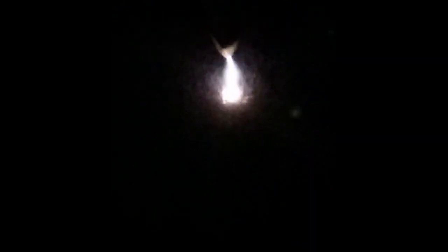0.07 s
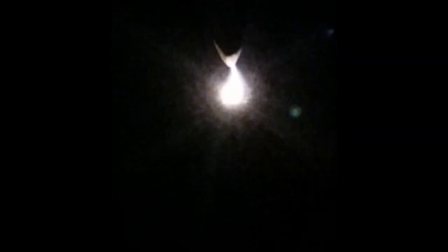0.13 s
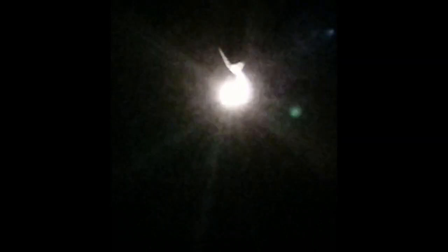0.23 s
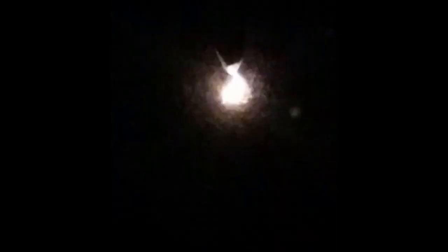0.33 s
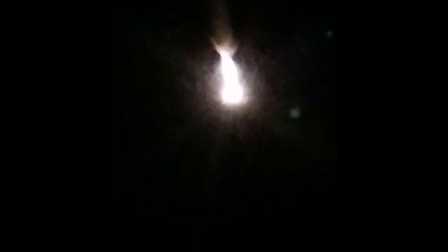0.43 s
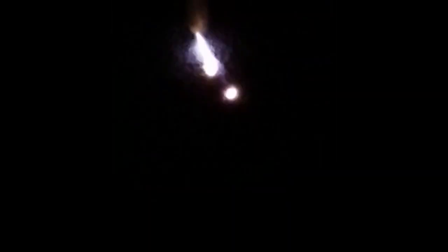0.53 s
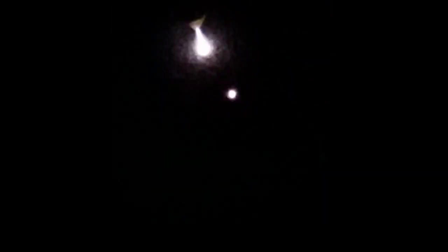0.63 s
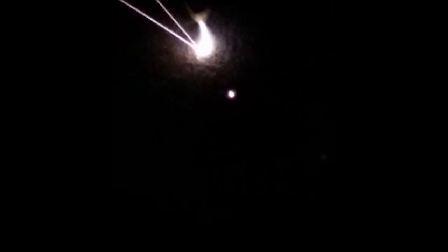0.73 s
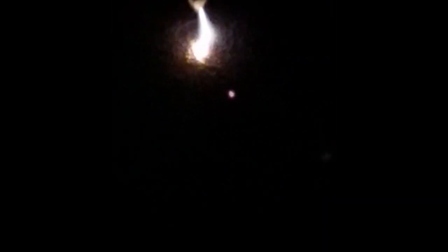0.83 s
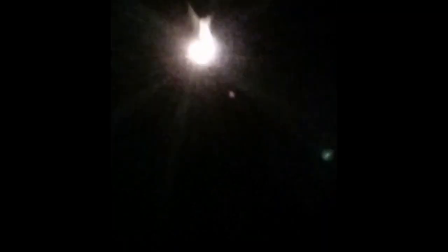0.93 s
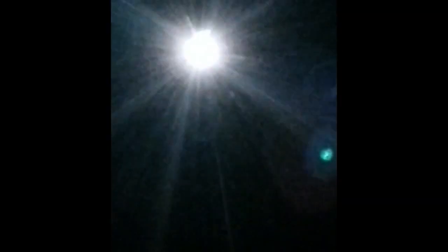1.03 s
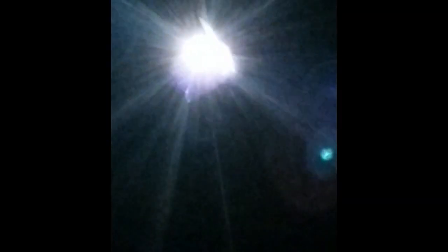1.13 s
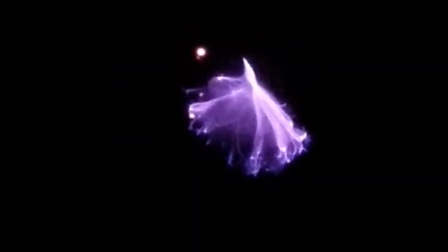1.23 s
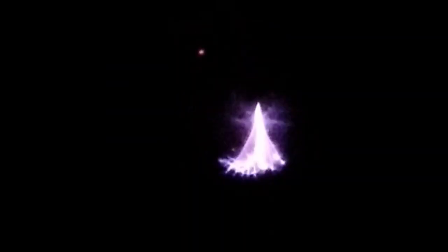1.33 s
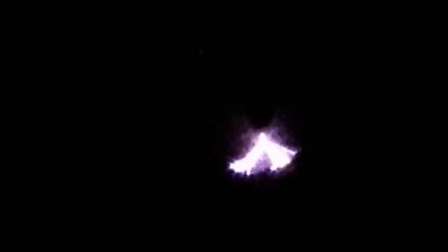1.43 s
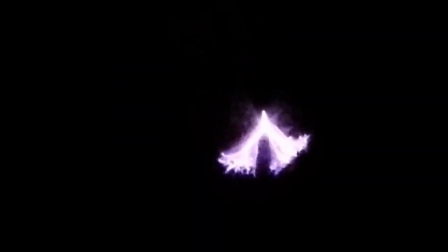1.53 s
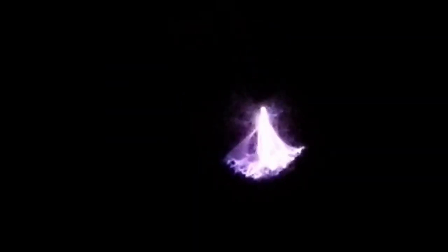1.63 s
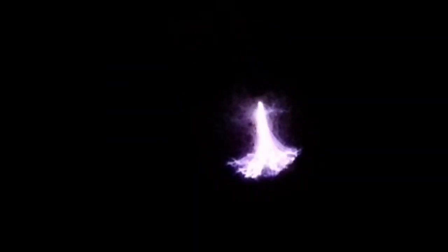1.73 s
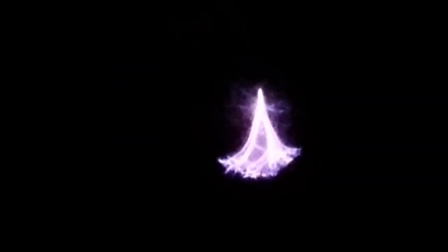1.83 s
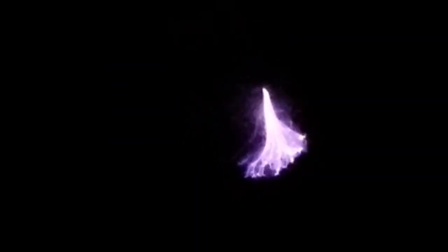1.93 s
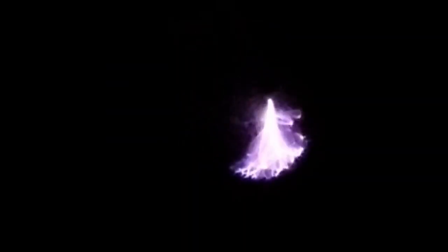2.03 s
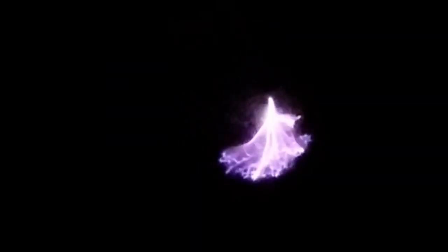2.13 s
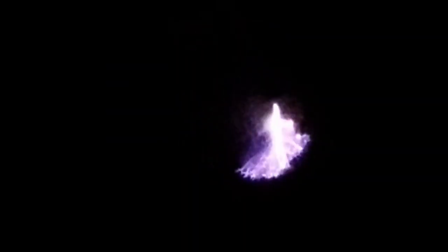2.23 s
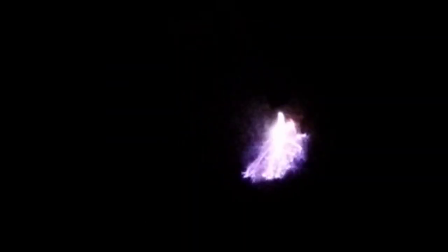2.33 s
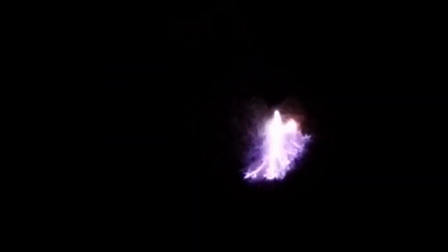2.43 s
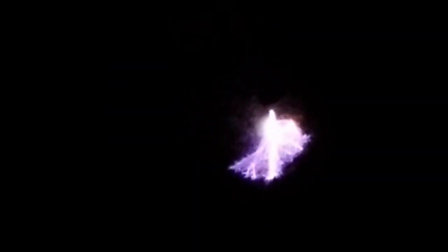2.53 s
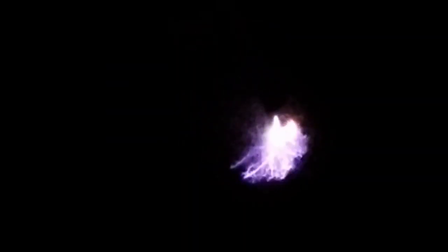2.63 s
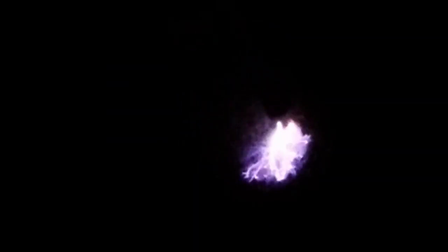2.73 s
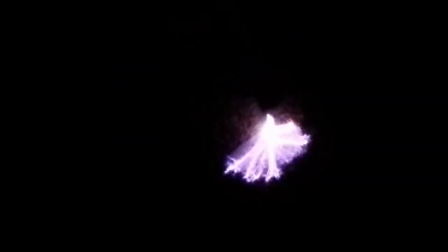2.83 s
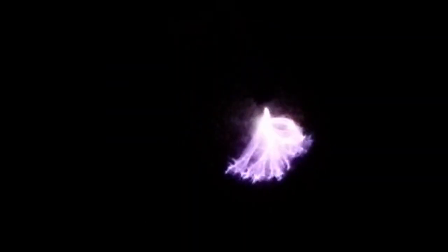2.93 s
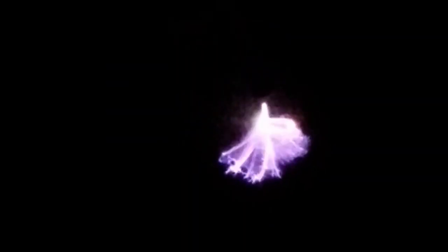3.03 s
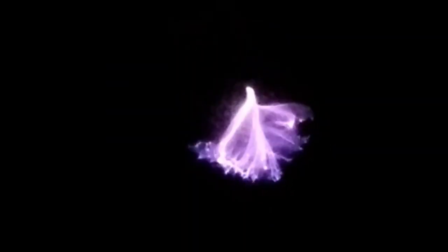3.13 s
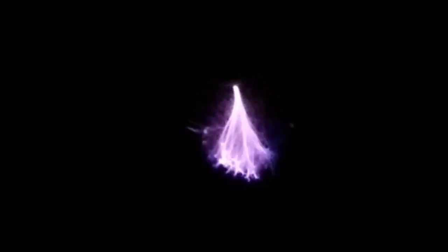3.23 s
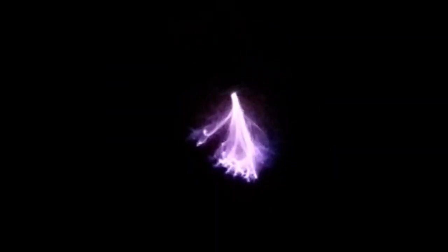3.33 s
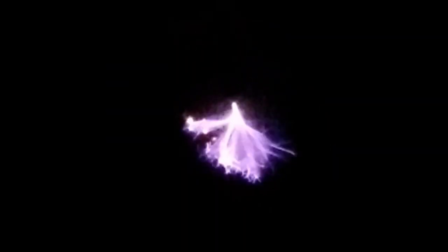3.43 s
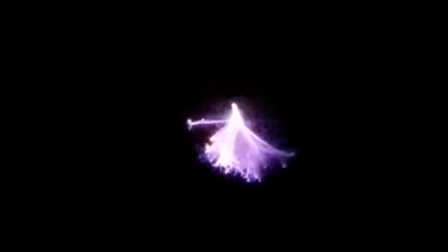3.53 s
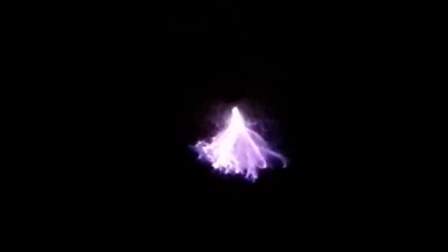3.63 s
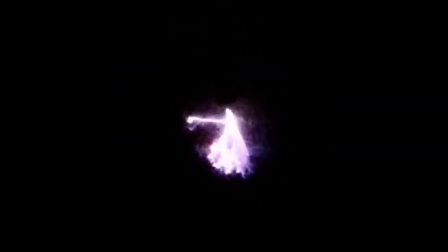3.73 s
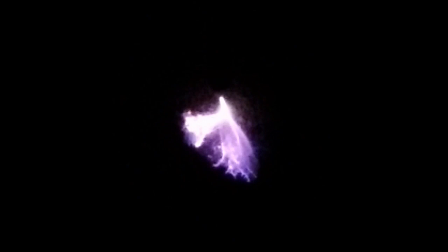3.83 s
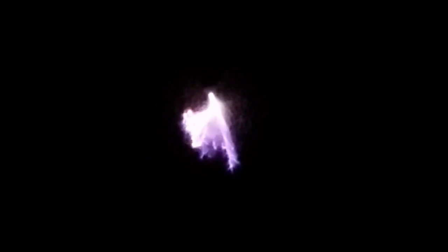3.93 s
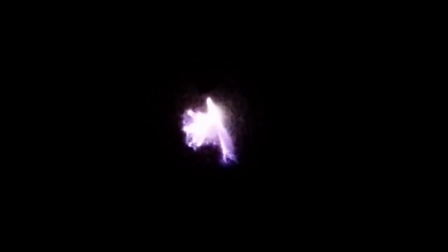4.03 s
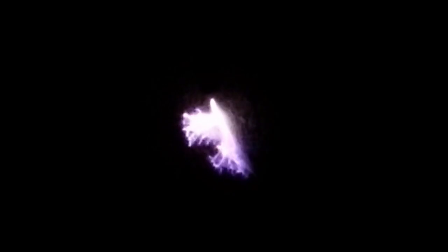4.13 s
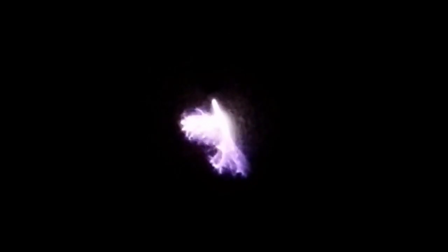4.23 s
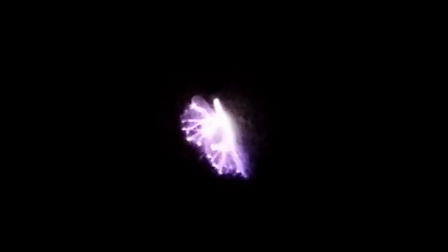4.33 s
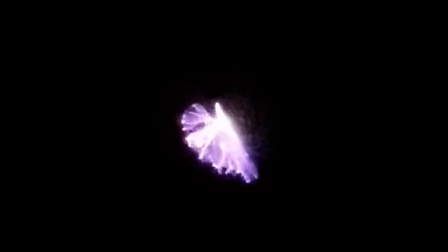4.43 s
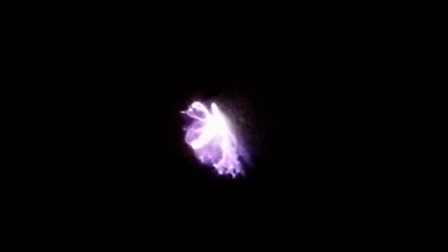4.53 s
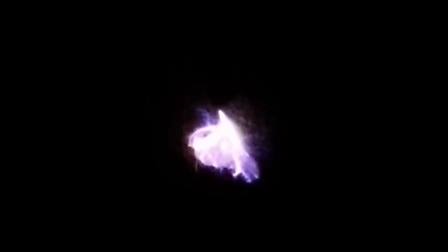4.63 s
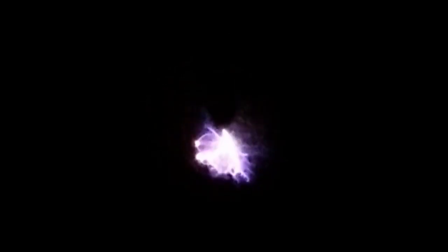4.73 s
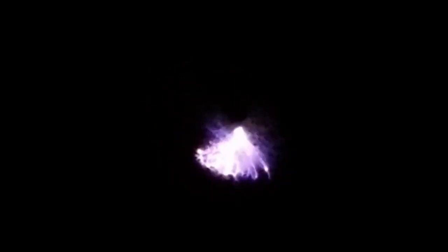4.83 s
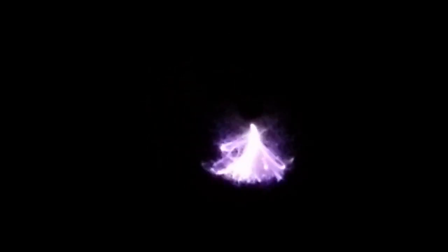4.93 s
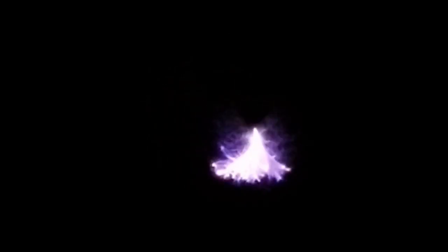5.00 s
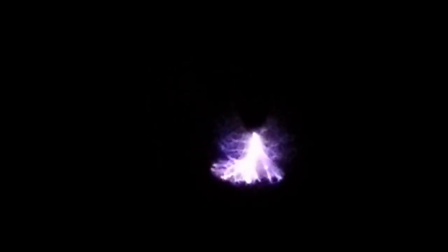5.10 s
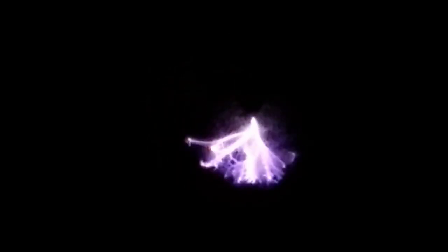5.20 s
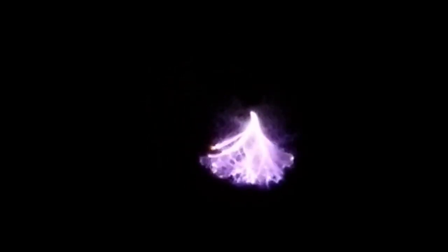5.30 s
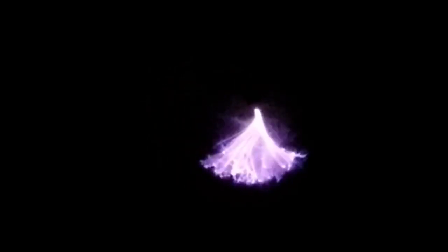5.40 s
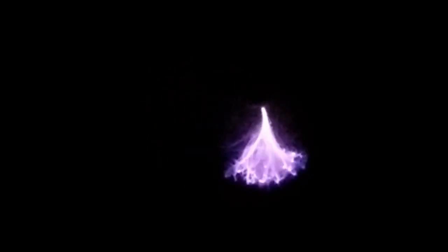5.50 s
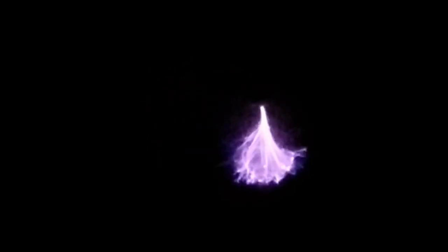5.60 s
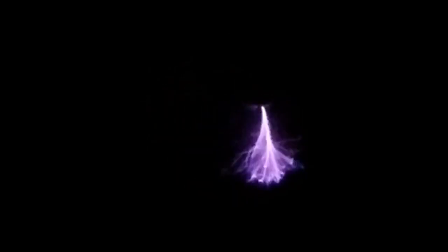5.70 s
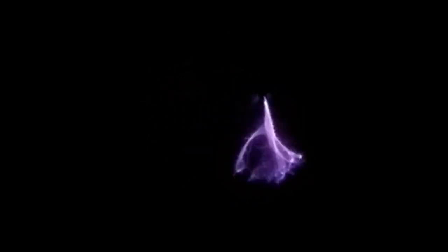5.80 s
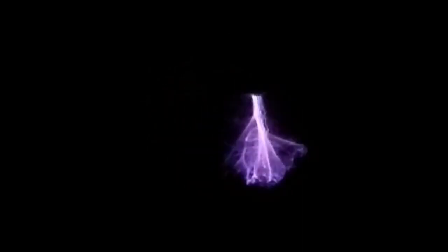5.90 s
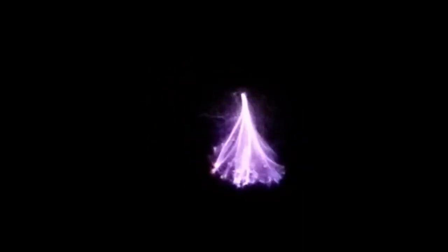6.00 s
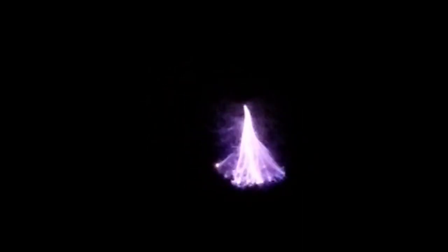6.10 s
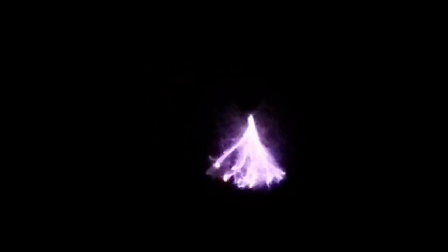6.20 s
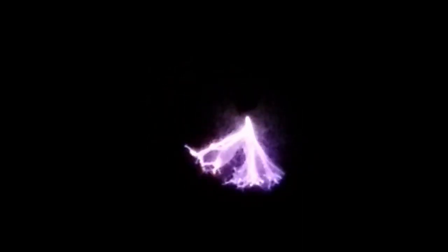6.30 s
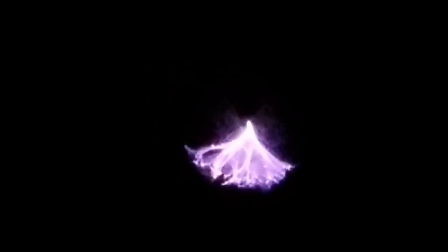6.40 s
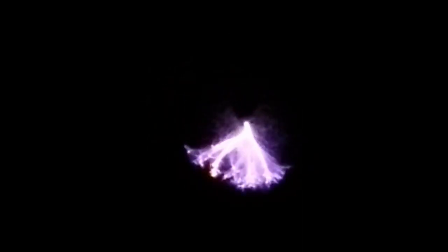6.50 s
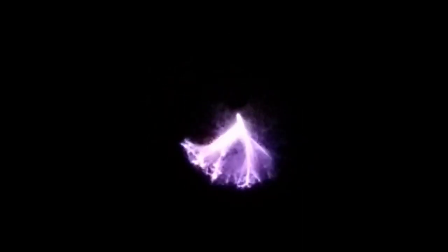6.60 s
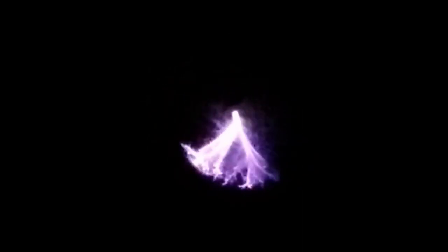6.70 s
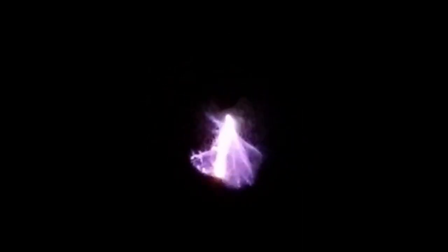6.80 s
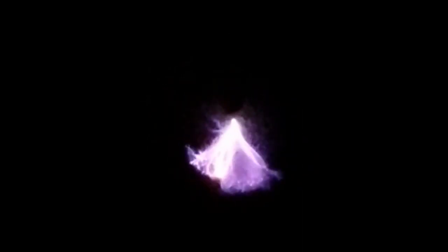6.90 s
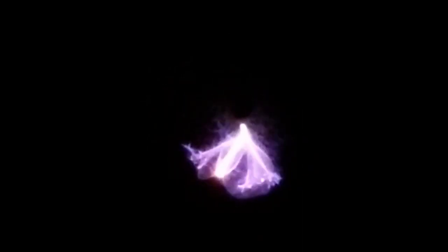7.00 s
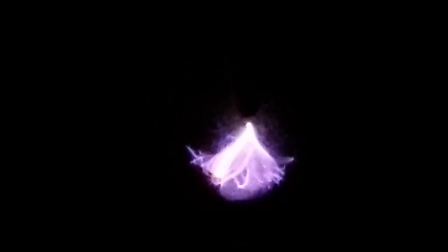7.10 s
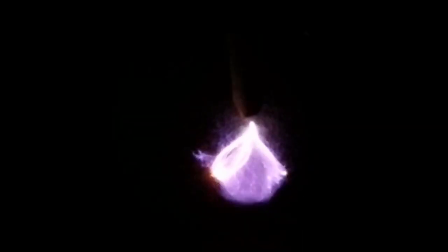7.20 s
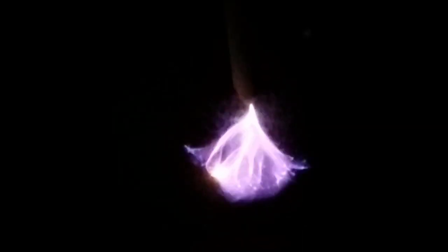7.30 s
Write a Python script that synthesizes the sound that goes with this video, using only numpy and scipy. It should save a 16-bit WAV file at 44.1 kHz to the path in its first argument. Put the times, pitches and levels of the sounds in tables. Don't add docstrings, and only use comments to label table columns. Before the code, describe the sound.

A harsh mains-rate electrical buzz starts thin, then bursts into loud whistling, sizzling spark trains with sharp snaps, soft puffs and a throbbing hum.

```python
import sys
import numpy as np
from scipy import signal
from scipy.fft import rfft, irfft, next_fast_len
from scipy.io import wavfile
from scipy.ndimage import uniform_filter1d, map_coordinates

SR = 44100
rng = np.random.default_rng(int(sys.argv[2]) if len(sys.argv) > 2 else 0)


def master_out(mix):
    frames = np.transpose(np.atleast_2d(mix))
    ceiling = np.clip(frames, -1, 1)
    pcm = np.round(ceiling * 32767).astype(np.int16)
    wavfile.write(sys.argv[1], SR, pcm)


def gain_from_db(level_db):
    decades = np.asarray(level_db, float) / 20
    return 10 ** decades


N = 324135
STRIKE_HZ = 120
SIZE = next_fast_len(N + SR // 2)
HZ = np.fft.rfftfreq(SIZE, 1 / SR)
TIME = np.arange(N) / SR


def unit(x):
    return x / np.sqrt(np.mean(x ** 2) + 1e-20)


def columns(rows, at, scale=lambda v: v):
    first, *rest = np.transpose(rows)
    return np.array([np.interp(scale(at), scale(first), c) for c in rest])


def wobble(rate):
    return map_coordinates(rng.standard_normal(int(N * rate / SR) + 4), [TIME * rate])


def filtered(x, response):
    return irfft(rfft(x, SIZE) * response, SIZE)[..., :N]


def highpass(hz, order):
    return (1j * HZ / (hz + 1j * HZ)) ** order


def lowpass(hz, order=1):
    return 1 / (1 + 1j * HZ / hz) ** order


def resonance(hz, width_hz):
    return 1j * HZ * width_hz / (hz ** 2 - HZ ** 2 + 1j * HZ * width_hz)


def causal(db):
    cepstrum = irfft(np.log(gain_from_db(db)), SIZE)
    cepstrum[:, 1:SIZE // 2] *= 2
    cepstrum[:, SIZE // 2 + 1:] = 0
    return np.exp(rfft(cepstrum))


def clicks(s, size):
    place = np.clip(np.ravel(s), 0, N / SR) * SR
    index = place.astype(int)[:, None] + np.arange(-7, 9)
    offset = index - place[:, None]
    kernel = np.sinc(offset) * np.cos(offset * np.pi / 16) ** 2
    weights = kernel * np.ravel(size)[:, None]
    return np.bincount(index.ravel() + 7, weights.ravel(), N + 32)[7:N + 7]


def excess(db, base_db):
    return np.sqrt(np.maximum(gain_from_db(db) ** 2 - gain_from_db(base_db) ** 2, gain_from_db(db - 15) ** 2))


def per_band(x, way, lo_hz, hi_hz):
    heard = filtered(x, way.mean(axis=0) * (HZ > lo_hz) * (HZ < hi_hz))
    return x / np.std(heard)


def shaky_tones(tones, level_db, level_rate, phase_rad, phase_rate):
    total = 0
    for multiple, db in tones:
        level = gain_from_db(db + level_db * wobble(level_rate))
        shake = phase_rad * wobble(phase_rate)
        total = total + level * np.sin(2 * np.pi * STRIKE_HZ * multiple * TIME + shake)
    return total


def path():
    # hz, left_db, right_db
    ports = [(232, -33, -37), (410, -45, -5), (480, -19.5, -14), (840, -13, -3), (1213, -1.5, -4),
             (2140, -10, -12.5), (2675, -1, 4), (3070, -3, -11), (3990, -1.5, -1), (4756, 5, -2.5),
             (6500, -6, -1), (7590, -6.5, -16.5), (9900, -20, -14.5), (13900, -19.5, -19)]
    # hz, width_hz, left_db, right_db
    case = [(520, 220, 2.5, -20), (2344, 140, 3.5, -27.5), (3514, 30, 8, -24), (4350, 1130, 3, -3),
            (5040, 220, 5.5, 7.5), (7155, 1150, -2.5, 7), (9100, 290, 11, 3.5), (10570, 120, 5, -36),
            (10870, 200, 11, -29), (11570, 140, 8, -37)]
    # delay_ms, left_db, right_db
    bench_echoes = [(0.882, -30, -13), (1.252, -16.5, -61), (1.422, -16.5, -15.5), (2.099, -11.5, -19),
                    (3.5, -29.5, -26), (4.298, -34, -12.5)]
    # hz, t60_s
    wall_decay = [(300, 0.42), (3000, 0.16), (12000, 0.015)]
    shell = 1 + sum(gain_from_db([[left], [right]]) * resonance(hz, width) for hz, width, left, right in case)
    right_lag = np.exp(-2j * np.pi * HZ * [[0], [.09e-3]])
    direct = -causal(columns(ports, HZ + 1, np.log)) * shell * right_lag
    bench = 1 + sum(gain_from_db([[left], [right]]) * np.exp(-2j * np.pi * HZ * ms / 1000)
                    for ms, left, right in bench_echoes)
    hz, t, noise = signal.stft(rng.standard_normal((2, SR // 3)), SR, nperseg=256)
    fade = gain_from_db(-60 * t / columns(wall_decay, hz + 1, np.log).T)
    tail = signal.istft(noise * fade, SR, nperseg=256)[1]
    walls = gain_from_db(-10) * rfft(np.pad(tail, ((0, 0), (130, 0))), SIZE) / np.linalg.norm(tail[0])
    return direct, direct * (bench + walls * highpass(900, order=2))


def shape():
    # start_s, strike_db, train_db, fine_db (above the train)
    short_paths = [(0.0, -47.5, -48, -1.5), (0.267, -52, -50.5, -2), (0.425, -53, -55, -3),
                   (0.558, -46.5, -42, -3.5), (0.608, -44.3, -44, 0), (0.765, -51, -48.5, -5.5),
                   (0.95, -47, -47.5, -5.5), (1.033, -48, -43.5, -2.5), (1.141, -54.5, -55, -1.5),
                   (1.217, -48.5, -46, -4.5)]
    # start_s, strike_db, train_db, fine_db (above the train)
    long_paths = [(1.275, -45.5, -35, -5), (1.317, -34.5, -29.5, -4.5), (1.356, -43.0, -26.5, -1),
                  (1.482, -43.5, -37.5, -0.5), (1.716, -45.5, -28, -3.5), (1.925, -46.5, -26.5, -1),
                  (2.148, -43.8, -25, -5.5), (2.191, -42.5, -31.5, -3.5), (2.4, -43, -34.5, -2.5),
                  (3.0, -39.5, -33, -3), (3.268, -42, -25.7, -4), (3.352, -46.5, -25, -2.3),
                  (3.56, -43, -31, -2.5), (3.807, -45, -38.5, 2.5), (4.058, -46.5, -41.0, -4.3),
                  (4.758, -43, -38, -1.5), (4.833, -45.5, -44.5, -1), (4.983, -42.2, -36, -1.5),
                  (5.06, -43.5, -28.5, -4), (5.183, -42, -31.5, -3.5), (5.308, -43, -25.5, -4.5),
                  (5.383, -47, -23.9, -4), (5.625, -46, -24.5, -2), (5.94, -67, -37.5, -4),
                  (6.027, -47, -26, -2), (6.36, -47, -33, -1.5), (6.71, -47, -27.5, -3.5),
                  (6.881, -41.5, -34.6, -2), (7.008, -42, -35, 2), (7.242, -40, -35, 4.6)]
    jump_s, creep_s = .016, .04
    slack_db, taut_db = -38, -25
    narrow_db, wide_db = -5, -1.5
    start_s, *levels = np.transpose(short_paths + long_paths)
    held = np.array(levels)[:, np.maximum(np.searchsorted(start_s, TIME) - 1, 0)]
    long = TIME > long_paths[0][0] - jump_s
    jump, creep = (uniform_filter1d(held, max(round(s * SR), 1), axis=1) for s in (jump_s, creep_s))
    strike_db, train_db, fine_db = np.where(long, jump, np.minimum(creep, jump + 3))
    stretch = long * np.clip((train_db - slack_db) / (taut_db - slack_db), 0, 1)
    wide = stretch * np.clip((fine_db - narrow_db) / (wide_db - narrow_db), 0, 1)
    return strike_db, train_db, train_db + fine_db, long, stretch, wide


def room_floor():
    hiss = filtered(rng.standard_normal((2, N)), highpass(640, order=2) * lowpass(4000))
    return gain_from_db(-62) * unit(hiss)


def core():
    # multiple (of the strike rate), level_db (above the strike)
    buzz_tones = [(4, -8.5), (5, -16.5)]
    load_db = uniform_filter1d(shape()[0], size=4000)
    buzz = shaky_tones(buzz_tones, level_db=1.5, level_rate=8, phase_rad=.3, phase_rate=12)
    return gain_from_db(load_db) * buzz * gain_from_db([[-2.5], [1.5]])


def throb():
    # multiple (of the strike rate), level_db
    hum_tones = [(.5, -19), (1, 3.5), (1.5, -23), (2, -6.5)]
    # hz, density_db (per Hz)
    rumble_colour = [(12, -39), (20, -17), (59, -2.5), (119, -4), (312, -6.5), (450, -5.5), (580, -8),
                     (990, -120)]
    # peak_s, peak_db (of the hum), width_s
    gas_swells = [(0.2, -60.5, 0.055), (0.74, -54, 0.043), (1.398, -47.5, 0.16), (1.7, -54.4, 0.067),
                  (1.93, -50, 0.13), (2.17, -54, 0.09), (2.35, -45, 0.17), (2.51, -46, 0.039),
                  (2.64, -57, 0.062), (2.8, -48.5, 0.42), (3.25, -42.5, 0.11), (3.69, -54, 0.23),
                  (3.81, -52.8, 0.062), (4.04, -49, 0.075), (4.221, -56, 0.12), (4.49, -49, 0.16),
                  (4.74, -42.5, 0.06), (5.07, -50.1, 0.07), (5.21, -46.5, 0.21), (5.4, -45.5, 0.11),
                  (5.54, -55.7, 0.19), (5.8, -57.4, 0.08), (5.87, -59.3, 0.04), (5.94, -71, 0.034),
                  (6.11, -66, 0.067), (6.38, -57.8, 0.12), (6.54, -52.5, 0.15), (6.84, -51.5, 0.084),
                  (7.06, -47, 0.069), (7.27, -46.5, 0.14)]
    # start_s, peak_db
    powder_puffs = [(1.325, -28), (1.684, -36), (2.154, -46), (2.494, -41), (2.622, -25), (3.195, -42.5),
                    (4.024, -28.5), (4.425, -44), (5.052, -35), (5.851, -43), (6.095, -48), (7, -43),
                    (7.23, -38)]
    *_, long, stretch, _ = shape()
    calm_db = np.where(long, -58 - 3.5 * stretch, -66.5)
    swells = sum(gain_from_db(db - 6 * (2 * (TIME - s) / width) ** 2) ** 2 for s, db, width in gas_swells)
    hum_db = 10 * np.log10(gain_from_db(calm_db) ** 2 + swells)
    rumble_db = -55.5 + 0.82 * (hum_db + 49)
    hum = unit(shaky_tones(hum_tones, level_db=2.2, level_rate=30, phase_rad=.8, phase_rate=9))
    colour = gain_from_db(columns(rumble_colour, HZ + 1, np.log))
    mid, side = filtered(rng.standard_normal((2, N)), colour)
    rumble = unit(mid * gain_from_db(1.9 * wobble(25))) + gain_from_db(-16.5) * unit(side) * [[1], [-1]]
    s, db = np.transpose(powder_puffs)
    puffs = filtered(clicks(s, gain_from_db(db + 34)), resonance(130, 150) * lowpass(500))
    return gain_from_db(hum_db - 2.0) * hum + gain_from_db(rumble_db + 2.0) * rumble + puffs


def snaps(way):
    # start_s, peak_db, low_db (low part against the peak)
    big_sparks = [(0.008, -26.5, -15), (0.733, -18.5, -32), (0.952, -31, -19), (1.278, -37, -20),
                  (1.325, -19.5, -30), (1.339, -37, -22), (1.355, -27, -19), (1.72, -21.5, -9),
                  (1.77, -25, -37), (2.187, -19.5, -27), (2.27, -22, -24), (2.503, -21, -14),
                  (3.654, -31, -24), (4.919, -23, -16), (5.061, -30, -21), (5.104, -18.5, -27),
                  (5.595, -16.5, -37.5), (5.823, -13, -13), (6.039, -14, -4), (6.536, -20.5, -13.5),
                  (6.711, -36, -23)]
    s, db, low_db = np.transpose(big_sparks)
    sharp = filtered(clicks(s, gain_from_db(db + 7.5)), highpass(800, order=2))
    dull = filtered(clicks(s, gain_from_db(db + low_db - 5)), lowpass(1800))
    loudest = np.abs(irfft(way.mean(axis=0), SIZE)).max()
    return filtered(sharp + dull, way / loudest)


def streamers():
    chance = rng.random((9000, 2))
    jump_s = chance[:, 0] * N / SR
    crest = 0.48 + 0.49 * np.cos(2 * np.pi * STRIKE_HZ * (jump_s - .006))
    strays = clicks(jump_s, crest * gain_from_db(-3.3 * np.log(chance[:, 1] + .015)))
    return filtered(strays, lowpass(4500, order=2))


def strikes(start, burst, long, wide):
    wander_ms = .012 * long + .3 * wide
    wander = wander_ms / 1000 * rng.standard_normal(start.shape)
    return filtered(clicks(start + wander, burst), lowpass(2200, order=2))


def spark_trains(zero, start, burst, long, stretch, wide, starved):
    # time_s, sparks_per_s
    recharge = [(0, 4150), (1.27, 4020), (1.48, 4070), (1.52, 7100), (1.7, 3200), (1.76, 4800), (1.9, 4240),
                (2.05, 4900), (2.25, 3900), (2.4, 5130), (3.2, 5600), (3.27, 3640), (3.42, 5260),
                (5.1, 5670), (5.31, 6430), (5.62, 4290), (6.35, 5960), (7.35, 5300)]
    rate = columns(recharge, zero).T
    disorder = np.where(long, .03 + .25 * wide, .04)
    length_ms = np.where(long, .09 + 0.56 * stretch ** 3 + 0.88 * wide, .14)
    length_ms = length_ms + .5 * long * starved
    scatter = rng.standard_normal((2, len(zero), 16))
    pace = rate * (1 + 0.41 * disorder * rng.standard_normal((len(zero), 1)))
    steps = np.abs(1 + disorder * scatter[0]) / pace
    after_ms = 1000 * (np.cumsum(steps, axis=1) - steps[:, :1])
    swell = np.exp(-(after_ms / length_ms - .6) ** 2) * gain_from_db(13 * disorder * scatter[1])
    swell = swell / np.linalg.norm(swell, axis=1, keepdims=True)
    train = clicks(start + after_ms / 1000, burst * swell)
    return filtered(train, highpass(1500, order=2) * lowpass(10000, order=2))


def fine_sparks(start, burst):
    from_hz = 7600
    t = TIME[:300] / 0.0014
    flare = signal.fftconvolve(clicks(start, burst), np.sqrt(t) * np.exp(-t ** 0.93))[:N]
    shared, *own = rng.standard_normal((3, N)) * gain_from_db(2 * rng.standard_normal(N))
    return filtered((shared + np.array(own)) * (0.78 + unit(flare)), HZ ** 6 / (HZ ** 6 + from_hz ** 6))


def arc(direct, way):
    # start_s, end_s, level_db
    gaps = [
        (5.809, 5.8215, -30),
        (5.828, 5.8385, -30),
    ]
    # hz, gain_db
    short_colour = [(1300, -0.5), (1800, -2.5), (2300, -0.5), (2900, 1.5), (3600, 7), (5000, -0.5),
                    (5900, 7), (7200, 4)]
    strike_db, whistle_db, sizzle_db, long, stretch, wide = shape()
    flicker_db = 1.3 * (1 - stretch) * wobble(20)
    whistle_db, sizzle_db = whistle_db + flicker_db, sizzle_db + 0.88 * flicker_db
    stray = np.clip(long * 0.21 + 0.36 * stretch + 0.09, 0, 1)

    zero = np.arange(N * STRIKE_HZ // SR) / STRIKE_HZ
    now = (zero * SR).astype(int)
    long_now, stretch_now, wide_now = np.array([long, stretch, wide])[:, now, None]
    starved = strike_db[now, None] < -53
    lag_ms = np.where(long_now, 2.9 + 1.097 * wide_now, 3.65)
    luck = rng.standard_normal((2, len(zero), 1))
    start = zero[:, None] + (lag_ms + .006 * luck[0]) / 1000
    burst = gain_from_db((1.2 + 1.2 * wide_now) * luck[1])

    strike = per_band(strikes(start, burst, long_now, wide_now), way, 450, 1600)
    crackle = per_band(streamers(), way, 450, 1600)
    low = np.sqrt(1 - stray) * strike + np.sqrt(stray) * crackle
    train = spark_trains(zero, start, burst, long_now, stretch_now, wide_now, starved)
    spill_db = strike_db + 8 + 10 * np.log10(stray + 0.0072)
    high = excess(whistle_db, spill_db) * per_band(train, way, 3000, 7800)
    sizzle = per_band(fine_sparks(start, burst), direct, 5580, 21000)
    fine = excess(sizzle_db, whistle_db - 9.0) * sizzle

    lit = gain_from_db(sum(db * (TIME > t0) * (TIME < t1) for t0, t1, db in gaps))
    sparks = lit * (gain_from_db(strike_db) * low + high)
    elsewhere = causal(columns(short_colour, HZ + 1, np.log))[0]
    sparks = long * sparks + filtered(~long * sparks, elsewhere)
    return filtered(sparks, way) + filtered(lit * fine, direct)


def scene():
    direct, way = path()
    return room_floor() + core() + throb() + snaps(way) + arc(direct, way)


def top_cut(x):
    return signal.sosfilt(signal.butter(12, 16540, fs=SR, output="sos"), x)


def record(dry):
    ceiling, top_hz = .97, 15830
    limited = dry / (1 + np.abs(dry / ceiling) ** 6) ** (1 / 6)
    mix = filtered(limited, HZ < top_hz)
    return top_cut(mix)


dry = scene()
out = record(dry)
master_out(out)
```